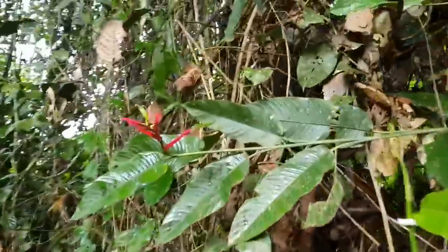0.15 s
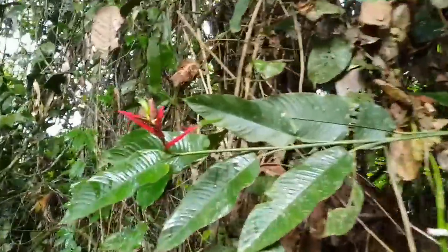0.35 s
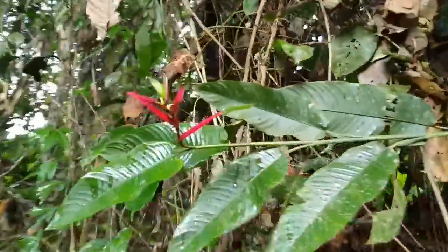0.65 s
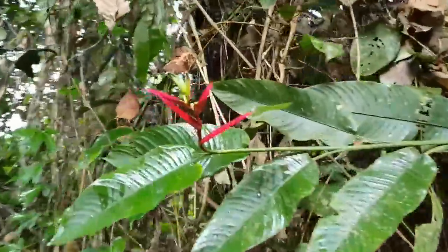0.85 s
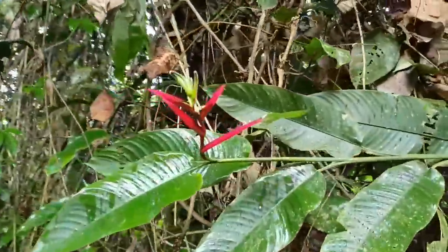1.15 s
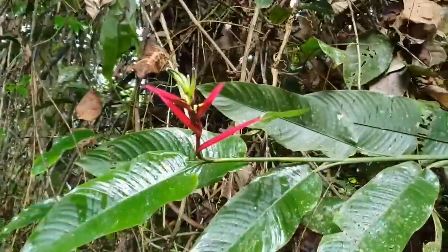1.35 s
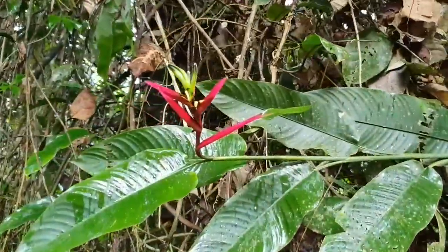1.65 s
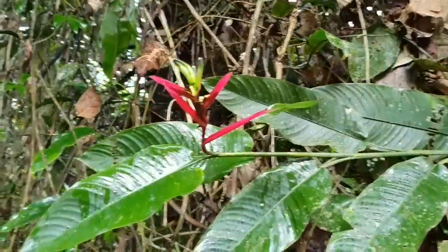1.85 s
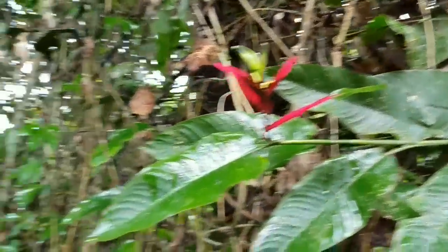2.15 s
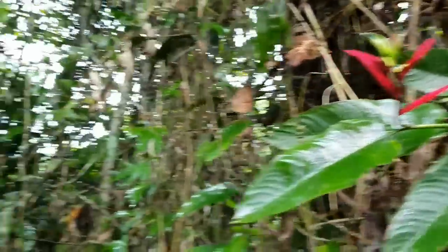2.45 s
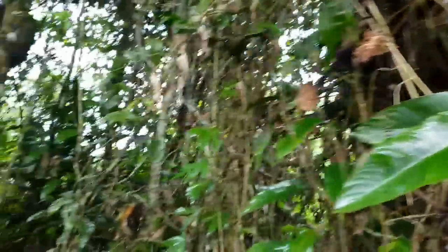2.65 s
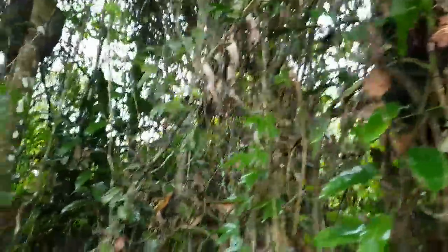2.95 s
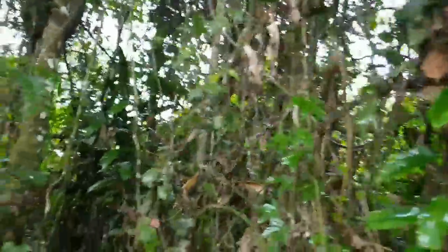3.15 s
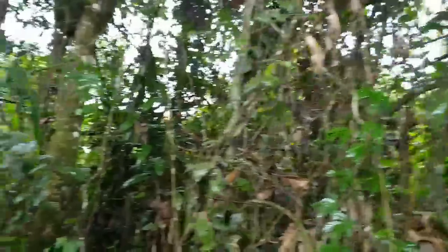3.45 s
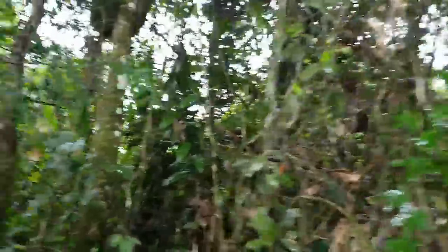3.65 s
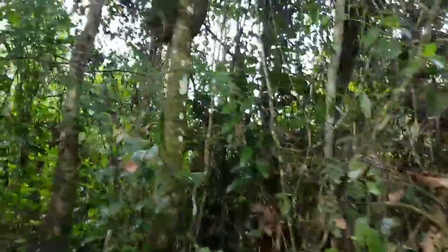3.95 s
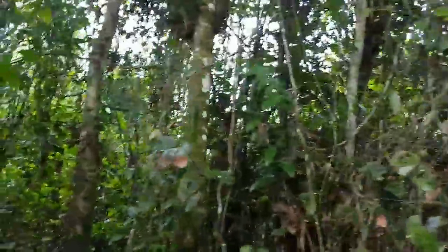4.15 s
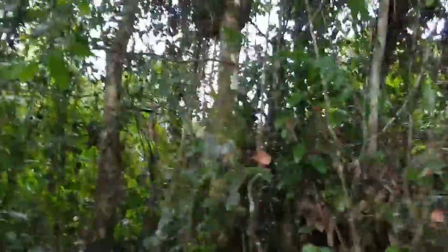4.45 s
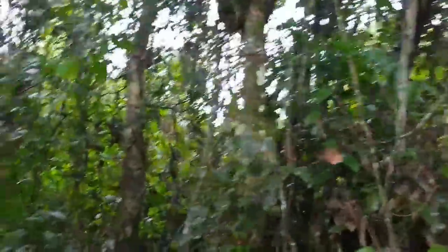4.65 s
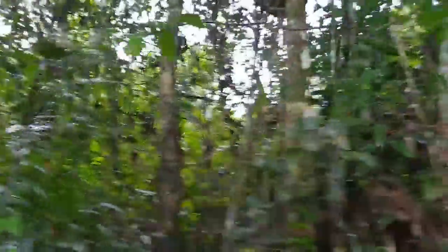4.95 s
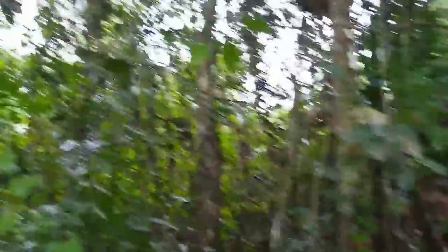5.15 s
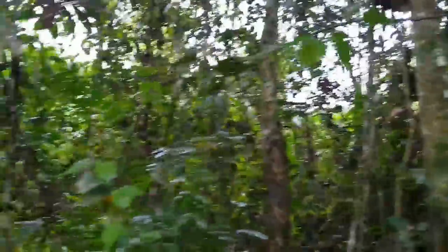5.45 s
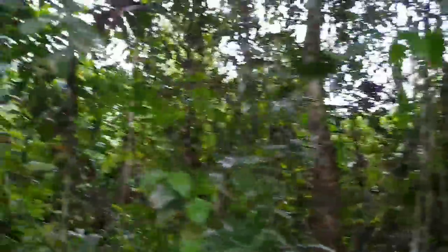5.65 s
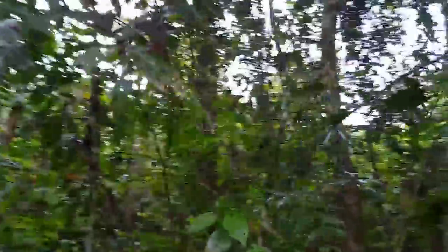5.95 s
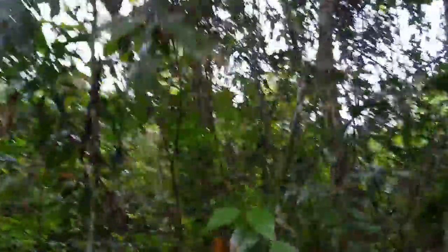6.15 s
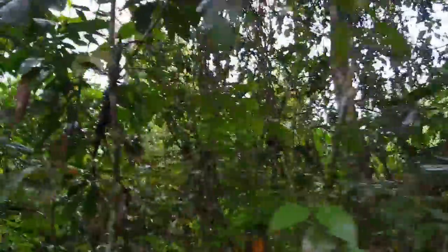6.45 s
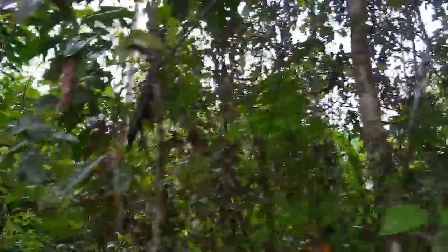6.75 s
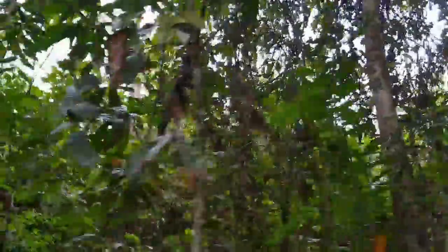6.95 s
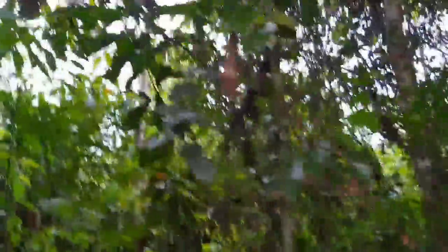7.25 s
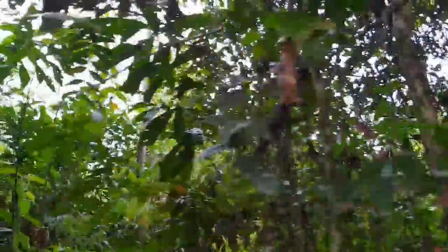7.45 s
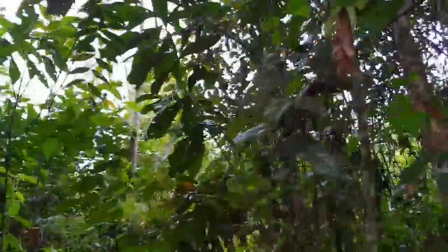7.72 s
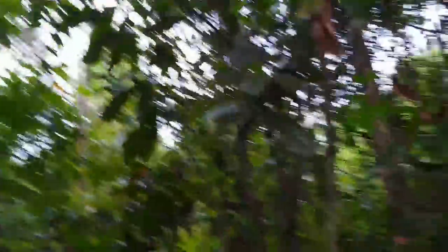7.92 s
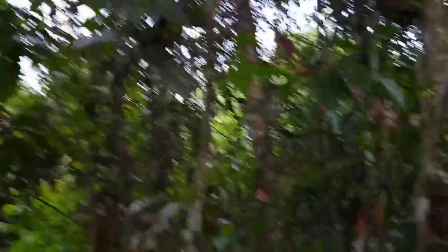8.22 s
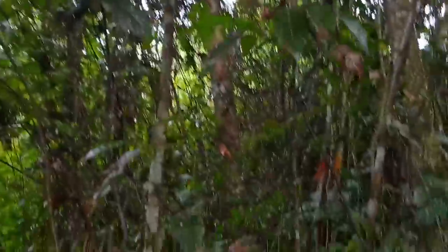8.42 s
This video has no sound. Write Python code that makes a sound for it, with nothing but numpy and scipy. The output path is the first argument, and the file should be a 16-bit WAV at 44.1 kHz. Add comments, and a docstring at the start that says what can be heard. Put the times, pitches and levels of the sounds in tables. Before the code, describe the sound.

A quiet rainforest with steady hush, thin shrill insects and a barely audible far engine. A bird calls at once as dry litter crackles nearby, then little but isolated twig clicks. Walking resumes with leaf swishes, soil crunches, root knocks and soft low puffs of air on the handheld stereo microphone. Birds whistle, hoot and warble; a violent cluster of sharp snaps near the end fades into light rustling.

```python
"""Rainforest undergrowth: someone steps slowly through it with a phone. Far behind lie a steady hush,
a slow engine of a few low harmonics and insects as resonant noise; air puffs on the phone as it swings.
Birds whistle and hoot in gliding sines, scattered by the trunks. Close by, soft leaves and dry litter
are showers of tiny ringing grains, soil crunches as uneven noise, feet knock on roots as damped tones,
and twigs snap as resonant cracks, thickest where one step crushes a heap of them."""
import sys
import numpy as np
from scipy import signal
from scipy.fft import rfft, irfft, next_fast_len
from scipy.io import wavfile

SR = 44100
rng = np.random.default_rng(int(sys.argv[2]) if len(sys.argv) > 2 else 0)


def store_pcm(level_fs):
    """Save levels as 16-bit WAV."""
    pcm = np.round(np.clip(level_fs, -1, 1) * 32767).astype(np.int16)
    wavfile.write(sys.argv[1], SR, np.atleast_2d(pcm).T)


N = 378378
T = np.arange(N) / SR

# steady stirring of the plants, before the mix trims: (swish_db, crackle_db, soil_db)
STIRRING_DB = (-54, -58.5, -57)


def amp(db):
    """Decibels to gain."""
    return 10 ** (np.asarray(db) / 20)


def unit(x):
    """Scale to rms 1."""
    return x / np.sqrt(np.mean(x ** 2))


def curve(rows):
    """Gain over time from (time_s, level_db) points."""
    return amp(np.interp(T, *np.transpose(rows)))


def add(out, s, x):
    """Mix a stereo sound in at time s."""
    i = max(int(s * SR), 0)
    out[:, i:i + x.shape[1]] += x[:, :max(N - i, 0)]


def colour(x, points):
    """Filter by a spectrum of (freq_hz, gain_db) points, joined on a log frequency scale."""
    n = next_fast_len(x.shape[-1], True)
    hz, db = np.transpose(points)
    bins_hz = np.fft.rfftfreq(n, 1 / SR)
    gain = amp(np.interp(np.log(bins_hz + 1), np.log(hz), db))
    return irfft(rfft(x, n) * gain, n)[..., :x.shape[-1]]


def ring(x, hz, q):
    """One resonance, gain 1 at its centre; centre and Q are held within safe limits."""
    b, a = signal.iirpeak(min(hz, SR / 3), max(q, 2.5 * hz / SR), SR)
    return signal.lfilter(b, a, x)


def walk(rate):
    """Random wander with a spread near 1: rate new values a second, still after 1024 of them."""
    return np.interp(T * rate, np.arange(1024), rng.standard_normal(1024))


def diffuse(x, port_gap_m=0.15):
    """Two unrelated signals as sound from all sides: the two ports agree mostly in the bass."""
    n = next_fast_len(x.shape[1], True)
    # 343 m/s is the speed of sound
    alike = .9 * np.sinc(2 * np.fft.rfftfreq(n, 1 / SR) * port_gap_m / 343)
    mid, side = irfft(rfft(x, n) * np.sqrt([1 + alike, 1 - alike]), n)[:, :x.shape[1]]
    return np.array([mid + side, mid - side])


def air(points):
    """Diffuse noise of a given colour, rms 1."""
    return unit(colour(diffuse(rng.standard_normal((2, N))), points))


def ports(x, pan_db, lag_ms):
    """Place a source: pan is left minus right level, a positive lag makes the left port later."""
    k = int(round(abs(lag_ms) * SR / 1000))
    late, early = np.pad(x, (k, 0)), np.pad(x, (0, k))
    pair = [late, early] if lag_ms > 0 else [early, late]
    return np.array(pair) * amp([[pan_db / 2], [-pan_db / 2]])


def burst(t60, size=2048, lump_db=0):
    """Decaying noise cut off after size samples, with unit energy; lumps break it into separate ticks."""
    x = rng.standard_normal(size) * np.exp(-np.log(1000) * np.arange(size) / SR / t60)
    x = x * amp(lump_db * rng.standard_normal(size).clip(-3, 3))
    return x / np.linalg.norm(x)


def trunks(x, near_t60=.4, far_t60=1.25, far_db=-16.5, onset_s=0.005, lump_db=5.5):
    """Echo of the forest, one second long: uneven reflections off near trunks and a fainter slow tail."""
    t = T[:SR]
    fade = amp(-60 * t / near_t60) + amp(far_db) * amp(-60 * t / far_t60)
    lumps = amp(lump_db * np.clip(rng.standard_normal(SR), -3, 3))
    paths = rng.standard_normal((2, SR)) * lumps
    echo = diffuse(paths) * fade * (1 - np.exp(-t / onset_s))
    echo = echo / np.linalg.norm(echo, axis=1, keepdims=True)
    return signal.fftconvolve(x, echo, axes=1)[:, :N]


def hush():
    """The forest's own sound: diffuse noise that slowly wanders in level."""
    # spectrum of the forest: (freq_hz, gain_db)
    hush_colour = [(20, -9), (45, -20), (90, 6), (170, -18.5), (350, -1), (650, -4), (1200, -1.5),
                   (2600, -1), (4000, -1.5), (5800, -4.5), (8000, -8), (9200, -9.5), (14000, -8.5),
                   (16000, -40)]
    return air(hush_colour) * amp(-52.0 + 1.4 * walk(2.51))


def engine(firing_hz=26.2):
    """A far engine: only the low thump of each firing carries, as a few wandering harmonics."""
    # harmonics of the thump, before swell and pan: (multiple of the firing rate, level_db)
    harmonics = [(2, -76.5), (3, -70.5), (4, -69), (5, -69.5), (6, -73.5), (7, -76.5), (8, -99)]
    # slow rise and fall of the whole engine: (time_s, level_db)
    engine_level = [(0, -1.5), (2, -2), (4, 0), (6.5, 3), (8.58, -1.5)]
    turns = np.cumsum(firing_hz * (1 + 0.0029 * walk(1.91))) / SR
    thump = np.zeros(N)
    for multiple, db in harmonics:
        level = np.sqrt(2) * amp(db + 2.5 * walk(4.2))
        thump += level * np.cos(2 * np.pi * multiple * turns)
    return thump * curve(engine_level) * amp([[.3], [-.3]])


def insects(flutter_db=2.0):
    """A far chorus: one thin shrill note inside a wider hiss, both noise through resonances, fluttering."""
    # bands of the chorus: (centre_hz, width_hz of each of two resonances, level_db)
    chorus_bands = [(7476, 160, -60), (7300, 1180, -58)]
    out = np.zeros((2, N))
    for hz, width_hz, db in chorus_bands:
        q = hz / width_hz
        chorus = ring(ring(rng.standard_normal((2, N)), hz, q), hz, q)
        out += unit(chorus) * amp(db + flutter_db * walk(40))
    return out


def swell(full_s, hold_s, attack_s=0.036, release_s=0.037):
    """Pressure builds up until full_s, holds, then dies away exponentially."""
    rise = np.clip((T - full_s) / attack_s + 1, 0, 1) ** 2
    return rise * np.exp(-np.clip((T - full_s - hold_s) / release_s, 0, 20))


def buffet(draught_db=-72):
    """Moving air: low noise, separate at each port, in a faint draught with puffs on top."""
    # puffs of air as the phone swings, before pan: (full_s, hold_s, level_db)
    air_puffs = [(3.023, 0.047, -66), (3.538, 0.11, -65), (3.656, 0.13, -52.5), (4.23, .05, -60),
                 (4.535, 0.12, -52.5), (4.812, 0.046, -49), (5.2, 0.47, -70), (7.06, 0.037, -66),
                 (7.62, 0.13, -58)]
    # spectrum of the buffeting: (freq_hz, gain_db)
    buffet_colour = [(15, -29), (45, 7.5), (80, 3.5), (130, -1), (300, -25), (1000, -63)]
    strength = amp(draught_db)
    for full_s, hold_s, db in air_puffs:
        strength = strength + amp(db) * swell(full_s, hold_s)
    rumble = unit(colour(rng.standard_normal((2, N)), buffet_colour))
    return rumble * strength * amp([[-1.5], [1.5]])


def foliage(hz, depth_db=6, spacing_hz=220):
    """Paths through leaves cancel at some pitches and add at others: a glide flickers, gain rms 1."""
    dips = rng.standard_normal(64).clip(-2, 1)
    return unit(amp(depth_db * np.interp(hz / spacing_hz, np.arange(64), dips)))


def birds(fade_db=5, scatter_db_per_octave=2.5):
    """Each note is a nearly pure glide that weakens as it goes; a farther bird arrives more as echo."""
    # calls: (start_s, kind, pitch_ratio, level_db, echo_over_direct_db)
    calls = [(0.0, "zigzag", 1.0, -39.5, 8), (3.238, "peep", 1.01, -44, 2),
             (3.624, "whistle", 0.97, -35, 3), (3.863, "whistle", 0.95, -34.5, 5),
             (4.004, "whistle", 0.95, -33, 6), (4.856, "chirrup", 1.22, -44, 3),
             (5.752, "hoot", 0.7, -46, -5), (5.864, "hoot", 0.95, -44.5, -8), (5.91, "hoot", 1.9, -53, -5),
             (5.999, "sweep", 0.95, -35, 5), (6.137, "sweep", 1, -36, 4), (6.33, "peep", 0.94, -49, 2),
             (7.276, "warble", 1.0, -36, -2), (7.447, "hoot", 1.03, -38, -21),
             (7.572, "slur", 0.97, -33.5, 8), (7.783, "coo", 0.98, -41.5, -3),
             (7.972, "peep", 1, -46.5, 5.5), (8.118, "chirrup", 1.01, -40.5, -4.5),
             (8.172, "twitter", 1.0, -47.5, 8), (8.334, "whistle", 1.01, -39.5, 8.5)]
    # notes of each kind: (delay_s, length_s, start_pitch_hz, end_pitch_hz, level_db, ease),
    # pitches before the call's ratio; ease 1 is a straight glide, more levels off toward the end
    songs = {"whistle": [(0, .056, 3520, 1900, 0, 1), (.056, .026, 1590, 1520, -16, 1)],
             "sweep": [(0, .062, 5500, 1260, 0, 1.9)], "peep": [(0, .03, 4960, 4800, 0, 2),
             (.014, .022, 4950, 5450, -5, 1), (.032, .04, 5250, 4820, 1, 4),
             (.068, .02, 4800, 5050, -5, 1)], "hoot": [(0, .021, 630, 650, 0, 1)],
             "coo": [(0, .056, 875, 848, 0, 1.3)], "warble": [(0, .02, 3850, 4650, -4, .55),
             (.02, .014, 4850, 5100, -11, 1), (.035, .013, 4050, 4550, 0, 1),
             (.068, .011, 4050, 4250, 3, .6), (.078, .006, 4650, 4950, -5, 1),
             (.084, .012, 4350, 3930, 2, 2), (.096, .013, 4400, 3850, 2, 1.5)],
             "slur": [(0, .03, 2700, 2000, -1, 1.3), (.05, .04, 1950, 2300, 0, 1),
             (.143, .036, 1950, 2650, -1.5, 1)], "chirrup": [(0, .018, 3600, 3330, -3, 1),
             (.02, .026, 3080, 3400, 1, .7)], "twitter": [(0, .012, 3400, 4050, -2, 1),
             (.021, .018, 4000, 3350, 0, 1.3), (.044, .014, 3400, 3950, -3, 1)],
             "zigzag": [(0, .014, 3500, 1950, 3, 1), (.035, .03, 2000, 4500, -3.5, 1),
             (.08, .03, 4600, 3000, -3, 1), (.13, .04, 4000, 1900, -6, 1)]}
    direct, scattered = np.zeros((2, 2, N))
    wobble = 1 + .011 * walk(260)
    for s, kind, pitch, db, echo_db in calls:
        for delay, length, start_hz, end_hz, note_db, ease in songs[kind]:
            n, i = int(length * SR), max(int((s + delay) * SR), 0)
            progress = np.linspace(0, 1, n)
            glide_hz = end_hz + (start_hz - end_hz) * (1 - progress) ** ease
            hz = pitch * glide_hz * wobble[i:i + n]
            note = np.sin(2 * np.pi * np.cumsum(hz) / SR) * signal.windows.tukey(n, .35)
            level = np.sqrt(2) * amp(db + note_db - fade_db * progress ** 2)
            # direct and echo share the call's level between them
            note = note * level / np.hypot(1, amp(echo_db))
            # leaves scatter the high part of a glide and let the low part through
            tilt_db = scatter_db_per_octave * np.log2(hz / hz.mean())
            add(direct, s + delay, ports(note * foliage(hz) * amp(-tilt_db), 1.0, -.05))
            add(scattered, s + delay, ports(note * amp(echo_db + tilt_db), 0, 0))
    return direct + trunks(scattered)


def effort():
    """Gains over time of swish, crackle and soil: steps add in power to the walker's steady stirring."""
    # steps and pushes through the plants, before the mix trims:
    # (full_s, hold_s, soft leaf swish_db, litter crackle_db, soil crunch_db)
    footsteps = [(0.41, .1, -48, -72, -58), (0.588, 0.054, -57, -53.5, -54),
                 (1.595, 0.2, -69.5, -57, -59.5), (2.595, 0.24, -66.5, -62, -59),
                 (3.05, .11, -48.5, -70, -59), (3.272, 0.22, -53, -59, -55),
                 (3.572, 0.14, -45.5, -55.5, -54), (4.218, 0.067, -45, -53.5, -52),
                 (4.343, 0.11, -48, -50.5, -77), (4.528, 0.025, -49, -48, -55), (4.69, .02, -46, -54, -54),
                 (4.751, .025, -48, -53, -44), (4.846, .185, -48, -51, -49), (4.878, .02, -46, -46, -58),
                 (5.47, 0.04, -54, -50, -51.5), (5.61, 0.07, -51.5, -50.5, -55.5),
                 (5.87, .05, -52, -67, -53), (6.262, 0.24, -49.5, -56, -57),
                 (6.835, 0.042, -51.5, -72, -66), (7.084, 0.023, -41.5, -53.5, -60.5),
                 (7.285, .04, -52, -51, -50), (7.36, .25, -42, -46, -48.5),
                 (7.652, .105, -41, -36.5, -43.5), (8.154, .06, -46.5, -66, -51.5)]
    # the walker's movement, which keeps the plants stirring between steps: (time_s, level_db)
    movement = [(0, 0.5), (1.2, -1.5), (2.3, -1.5), (3.1, 0.5), (4.8, 1.5), (6.3, 2.5), (6.65, -3.5),
                (7.4, 6.5), (8.05, -4.5), (8.58, -8)]
    power = np.outer(amp(STIRRING_DB), curve(movement)) ** 2
    for full_s, hold_s, *db in footsteps:
        power += np.outer(amp(db), swell(full_s, hold_s)) ** 2
    return np.sqrt(power)


def grains(rate, spread_db, ring_t60, count=24):
    """Tiny fractures, rate a second and few of them large, shared among leaves of fixed ring and place."""
    out = np.zeros((2, N))
    for hz in np.geomspace(1500, 12000, count):
        leaf = ring(burst(ring_t60, size=256), hz, 0.97)
        leaf = ports(leaf, rng.normal(-1.0, 0.64), rng.normal(0.022, .2))
        # 4000 possible fractures per leaf, of which a random share happens
        chance = rng.random((3, 4000))
        happens = chance[2] < rate * T[-1] / count / chance.shape[1]
        when, size, _ = chance[:, happens]
        size = amp(-spread_db * np.log(size + .01))
        at = (when * N).astype(int)[:, None] + np.arange(leaf.shape[1])
        out += [np.bincount(at.ravel(), np.outer(size, side).ravel(), N)[:N] for side in leaf]
    return unit(out)


def undergrowth(swish_db=-1, crackle_db=4, uneven_db=1.5):
    """With each step soft leaves swish past the legs, dry litter crackles and soil crunches under it."""
    # spectra of dry litter, soft leaves and soil: (freq_hz, gain_db)
    litter_colour = [(300, 6), (1400, -15), (2600, 5.5), (5000, 2.5), (7800, 1.5), (9200, -0.5),
                     (11000, 2.5), (14500, -4.5), (16000, 0)]
    leaf_colour = [(500, -0.5), (1500, -4.5), (2200, 2.5), (2700, -2.5), (4000, -2), (5500, -10.5),
                   (8000, -7.5), (10000, -28)]
    soil_colour = [(60, -44), (150, -2), (400, -2.5), (800, -0.5), (1300, -5), (2000, -4.5), (4000, -40)]
    crackle = unit(colour(grains(rate=1800, spread_db=3.5, ring_t60=0.022), litter_colour))
    swish = unit(colour(grains(rate=3200, spread_db=5.0, ring_t60=0.014), leaf_colour))
    # fast level wander makes the soil noise crunch
    soil = unit(air(soil_colour) * amp(3.36 * walk(90))) * amp([[.8], [-.8]])
    brush, crush, press = effort() * amp(uneven_db * walk(14))
    return swish * brush * amp(swish_db) + crackle * crush * amp(crackle_db) + soil * press


def knocks(scuff_db=-11, contact_s=0.00044):
    """A soft contact starts a dull, quickly damped ring with a little scuff in it."""
    # feet on sticks, roots and soil, level before the last resonance and pan:
    # (start_s, level_db, pitch_hz, t60_s)
    foot_knocks = [(.611, -40, 298, 0.031), (2.613, -37, 825, 0.048), (3.402, -29, 680, 0.015),
                   (3.472, -10.5, 525, 0.009), (3.4742, -23, 355, 0.03), (3.4863, -26, 347, 0.031),
                   (3.576, -32.5, 830, .022), (4.1, -33, 940, 0.02), (4.236, -22, 370, 0.01),
                   (4.262, -33, 290, 0.03), (4.282, -23.5, 743, 0.018), (5.65, -37, 147, 0.064),
                   (7.443, -27.5, 355, 0.018), (7.524, -37, 149, .087), (7.645, -24, 153, 0.037),
                   (7.676, -25.5, 330, 0.038), (7.689, -32, 105, 0.077), (7.698, -29.5, 395, 0.065),
                   (7.749, -26, 507, 0.02), (8.529, -39.5, 960, 0.017)]
    out, t = np.zeros((2, N)), T[:SR // 5]
    for s, db, hz, t60 in foot_knocks:
        scuff = unit(ring(ring(rng.standard_normal(len(t)), hz, 0.73), hz, 0.73))
        tone = np.sin(2 * np.pi * hz * t)
        knock = (tone + amp(scuff_db) * scuff) * amp(db - 60 * t / t60)
        knock = knock * (1 - np.exp(-t / contact_s))
        add(out, s, ports(ring(knock, hz, 0.34), 2.7, .12))
    return out


def twigs(count=170, base_db=-42.5, db_per_db=0.7872, spread_db=2.5, centre_hz=3305, body_db=-17):
    """Small random snaps, more often and louder where litter is crushed harder; rows as the snap table."""
    crush = effort()[1] / amp(STIRRING_DB[1])
    at = np.searchsorted(np.cumsum(crush) / crush.sum(), rng.random(count)).clip(0, N - 1)
    size, pitch, side = rng.standard_normal((count, 3)).T.clip(-2, 2)
    db = base_db + db_per_db * 20 * np.log10(crush[at]) + spread_db * size
    hz = centre_hz * 2 ** (.4 * pitch)
    return list(np.column_stack([T[at], db, hz, np.full(count, body_db), 3 * side]))


def snaps(crack_cycles=14, crack_q=0.43, broaden_db_per_db=0.92, crack_db=11.0, break_db=-4.5,
          body_db=10, body_hz=850, body_t60=0.026,
          splinter_t60=0.08, splinter_db=-12, splinter_db_per_db=0.2954, splinter_lump_db=9):
    """A fibre breaks with a sharp crack, the stick rings low, and splinters stir the leaves round it."""
    # louder twigs and dry leaves, levels before crack_db, body_db and colour:
    # (start_s, level_db, pitch_hz, body_level_db, left_minus_right_db)
    loud_snaps = [(.171, -24, 3240, -32.5, 2.5), (0.186, -26, 3284, -34, -2), (.242, -35, 2400, -12, 2),
                  (0.381, -23.5, 1900, -11, -2), (0.4187, -34, 2240, -20, -1),
                  (0.4206, -27.5, 2300, -16, -2), (.391, -35, 2210, -8, -1.5), (0.451, -36, 2400, -6, 0),
                  (0.469, -30, 2150, -9, -1.5), (.483, -35, 2000, -16, -1), (0.4987, -35, 2740, -13, -0.5),
                  (.5025, -41, 2500, -8, -1), (0.612, -39, 3520, -5, 0.5), (.645, -41, 3420, -10, 1),
                  (0.723, -27.5, 2980, -26, -2.5), (0.773, -26.5, 6620, -27, 2),
                  (.971, -31.5, 2830, -22, 1), (1.15, -38, 7460, -26, -1), (1.249, -29, 1670, -13, -2.5),
                  (1.6292, -31.5, 7460, -30, 9.5), (1.67, -28, 6260, -15.5, 3), (1.7911, -25, 3000, -23, 4),
                  (1.852, -41, 2780, -7, 1.5), (2.132, -32.5, 7470, -28, 2), (2.167, -20, 4640, -17, -0.5),
                  (2.213, -34, 2560, -26, 1.5), (2.242, -31, 4680, -22, 2.5), (2.252, -33, 2200, -13, -2.5),
                  (2.3362, -23, 2780, -42, 5), (2.454, -37, 2080, -19, 1.5), (2.496, -31, 2420, -20, 1.5),
                  (2.582, -23.5, 3250, -13.5, 1.5), (2.612, -21.5, 4380, -9, 2), (2.775, -30, 2910, -17, 2),
                  (3.04, -45, 4120, -24, -4), (3.066, -37, 2970, -24, 0), (3.14, -30, 3270, -12, -1),
                  (3.298, -29, 5600, -28, 0.5), (3.361, -35, 2840, -19, -1.5),
                  (3.415, -23.5, 9100, -21, 0.5), (3.471, -33, 2220, -14, 1.5), (3.483, -26, 4900, -31, 0),
                  (3.7687, -23, 2620, -21, -3.5), (3.775, -34, 4500, -26, 2), (4.2479, -29, 4800, -8, 1.5),
                  (4.411, -30.5, 3000, -20, 0), (4.4216, -21, 6100, -36, -4), (4.5105, -25, 3200, -14, 2),
                  (4.767, -34, 4200, -27, -2.5), (4.8072, -31.5, 1650, -8, 1.5),
                  (4.891, -34, 3400, -24, -5), (4.954, -30, 4060, -18, 1), (4.981, -36, 3500, -24, -3.5),
                  (5.101, -33, 4380, -8, -2.5), (5.174, -31.5, 2500, -11, 1.5), (5.286, -35, 3020, -10, -1),
                  (5.3265, -39, 3100, -2.5, 2.5), (5.334, -27, 3960, -16, 2), (5.4403, -26.5, 3100, -22, 1),
                  (5.469, -34, 3260, -14, 0), (5.497, -31, 5000, -24, -1), (5.627, -29, 3850, -30, -0.5),
                  (6.208, -34, 1840, -3, 3), (6.83, -28, 2730, -34, 0), (6.869, -30.5, 2820, -21, 0.5),
                  (7.03, -30.5, 1800, -19, -1), (7.106, -30, 3300, -25, -1), (7.182, -31.5, 3460, -8.5, 2),
                  (7.373, -29, 7050, -26, -1.5), (7.442, -26.5, 3200, -5, -14),
                  (7.4443, -36, 3300, -17, -11), (7.5215, -12, 6300, -18.5, -7.5),
                  (7.529, -21, 3880, -15.5, -4), (7.6174, -11, 4400, -19, -3), (7.6183, -18, 4000, -14, -4),
                  (7.623, -18.5, 3600, -10, -0.5), (7.646, -10, 5830, -18, -3),
                  (7.652, -19, 3800, -8.5, -5.5), (7.675, -7, 5460, -20, -1), (7.687, -18, 6030, -32, 0),
                  (7.6882, -7.5, 6260, -39, 0.5), (7.6875, -19, 4300, -26, -7),
                  (7.701, -11.5, 5100, -19, -4), (7.7043, -25, 4200, -27, -4.5),
                  (7.7253, -14.5, 5470, -30, -5), (7.733, -25, 2230, -12, -3), (7.7476, -19, 4500, -22, -3),
                  (7.7596, -14, 5000, -17.5, 1), (7.774, -28, 2080, -22, .5),
                  (8.108, -34.5, 3450, -12, -.5), (8.174, -34, 3730, -11, 1.5), (8.192, -37, 3000, -8, 1),
                  (8.305, -29.5, 6200, -16, 0.5)]
    # spectrum laid over all snaps: (freq_hz, gain_db)
    snap_colour = [(60, -12), (150, 3), (500, -2.5), (1400, 0), (3500, 3), (5500, 0.5), (7800, 3.5),
                   (9000, 1), (14500, 6.5), (16000, -18)]
    out = np.zeros((2, N))
    for s, db, hz, low_db, pan_db in loud_snaps + twigs():
        # one sharp break, then tearing: longer in low-pitched, thick pieces than in thin ones
        tear = burst(crack_cycles / hz)
        fracture = amp(break_db) * signal.unit_impulse(len(tear)) + tear
        # a light snap rings at the twig's own pitch, a hard one is broader
        q = crack_q * amp(-broaden_db_per_db * db)
        crack = ring(ring(fracture, hz, q), hz, 0.15)
        body = ring(burst(body_t60), body_hz, 0.97)
        body = amp(low_db + body_db) * body / np.linalg.norm(body)
        stick = crack / np.linalg.norm(crack) + body
        splinters = np.array([burst(splinter_t60, lump_db=splinter_lump_db) for _ in range(2)])
        tail = ring(splinters, hz, 0.88)
        # the stirred leaves take a smaller share of a harder snap
        tail_db = splinter_db - splinter_db_per_db * db
        # the sound tends to reach the louder port first
        lag_ms = np.clip(-.07 * pan_db, -.2, .2) + rng.normal(0, 0.043)
        add(out, s + .001, ports(stick, pan_db, lag_ms) * amp(db + crack_db))
        add(out, s + .002, tail / np.linalg.norm(tail[0]) * amp(db + crack_db + tail_db))
    return colour(out, snap_colour)


def scene():
    """The steady forest and its birds, then the near steps with a faint echo off the trunks."""
    forest = hush() + engine() + insects() + buffet() + birds()
    steps = undergrowth() + knocks() + snaps()
    return forest + steps + amp(-19.0) * trunks(steps)


def record(dry, top_hz=15400):
    """The phone rounds the sharpest cracks and cuts the top."""
    rounded = .9 * np.tanh(dry / .9)
    return signal.sosfilt(signal.ellip(8, .2, 70, top_hz, fs=SR, output="sos"), rounded)


dry = scene()
out = record(dry)
store_pcm(out)
```